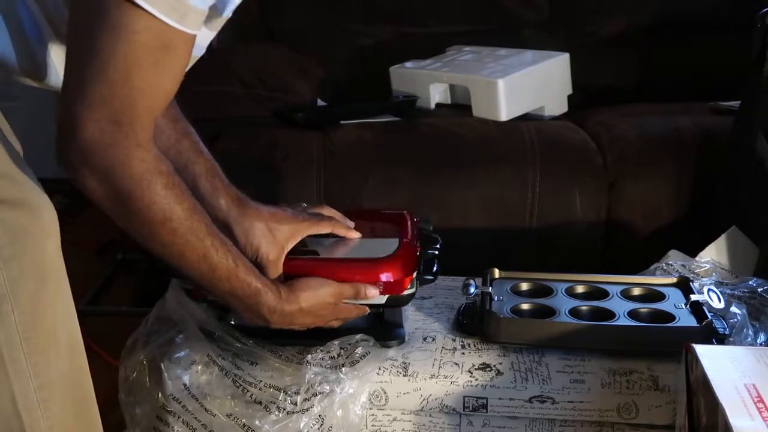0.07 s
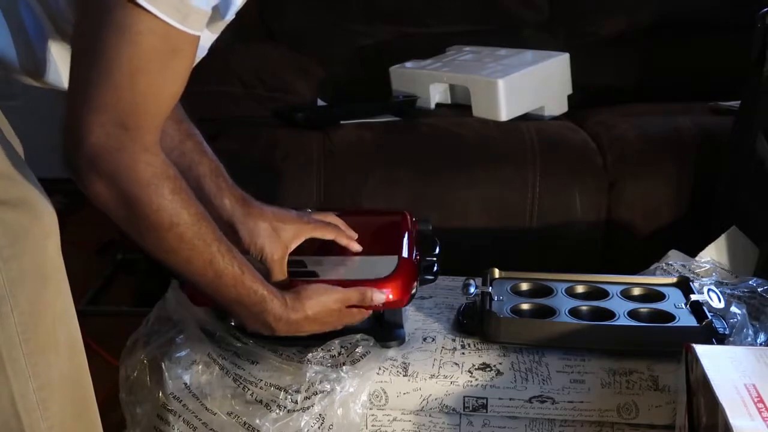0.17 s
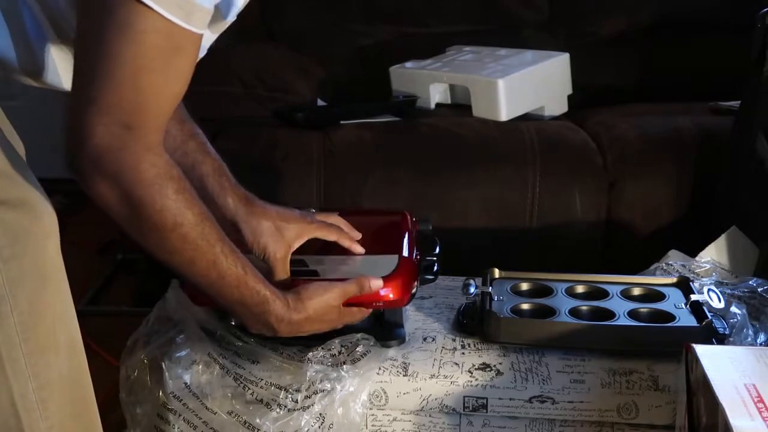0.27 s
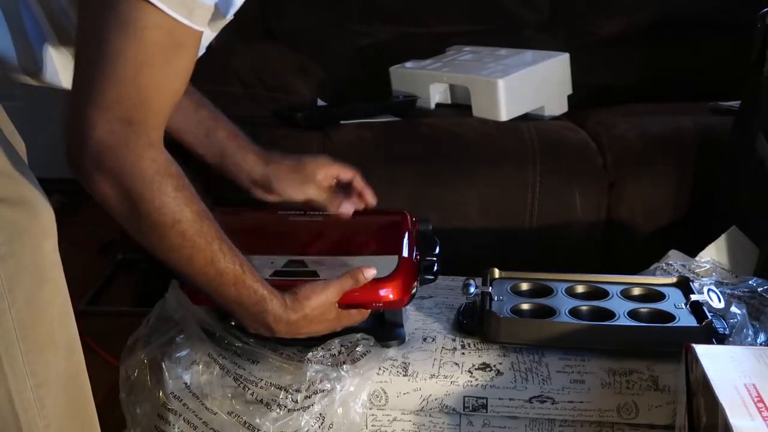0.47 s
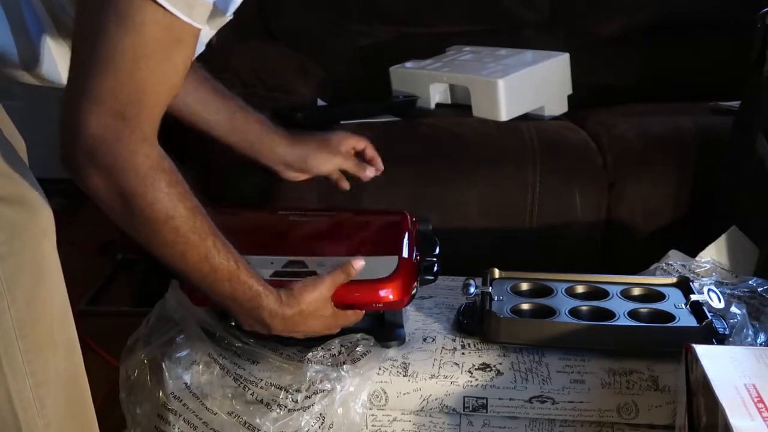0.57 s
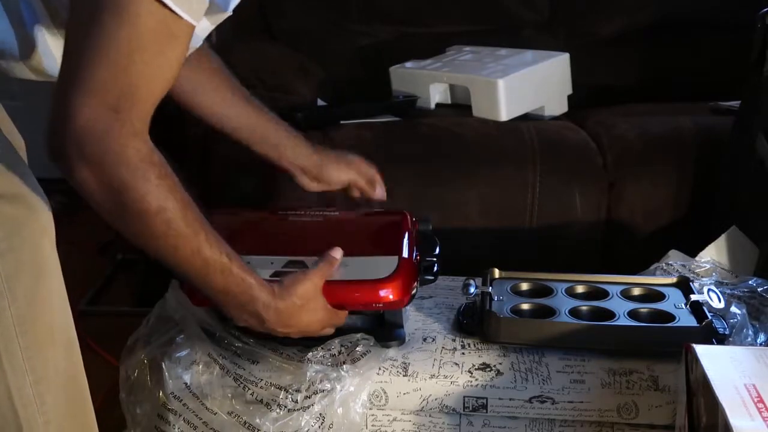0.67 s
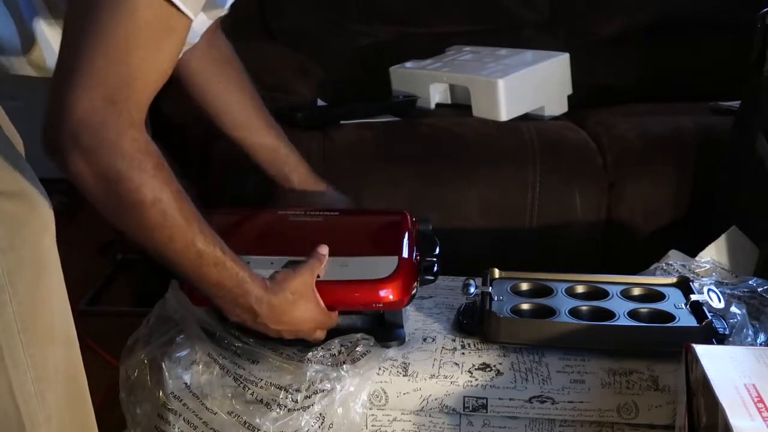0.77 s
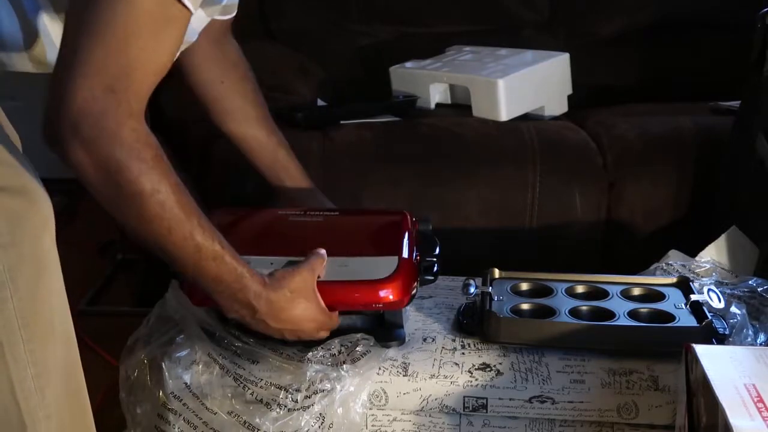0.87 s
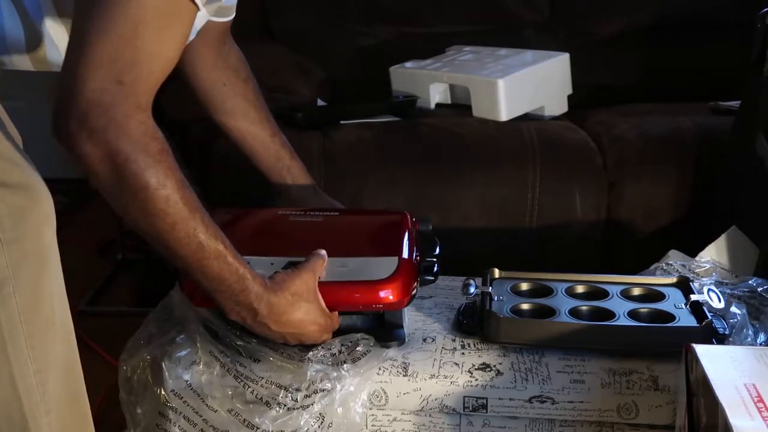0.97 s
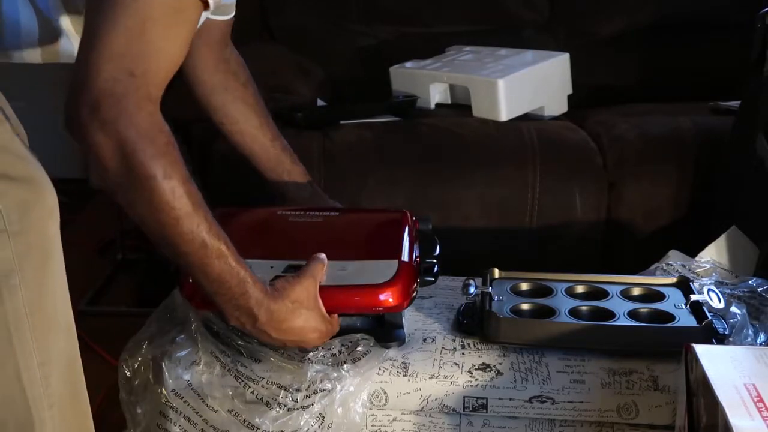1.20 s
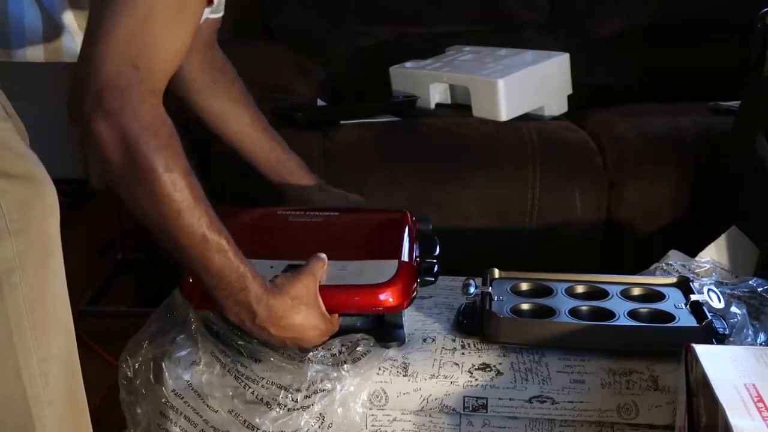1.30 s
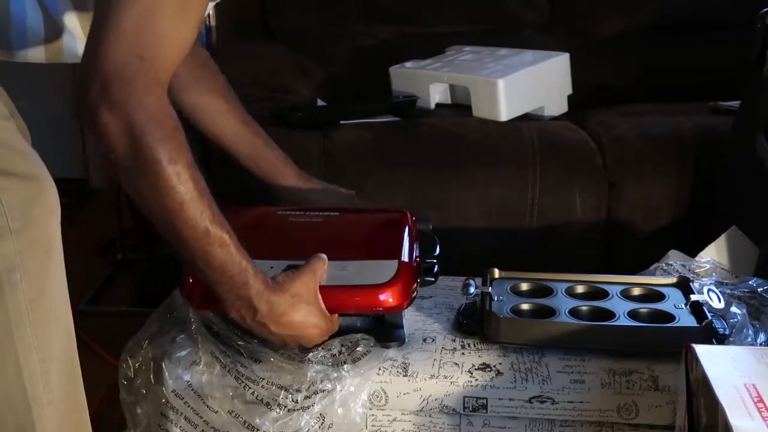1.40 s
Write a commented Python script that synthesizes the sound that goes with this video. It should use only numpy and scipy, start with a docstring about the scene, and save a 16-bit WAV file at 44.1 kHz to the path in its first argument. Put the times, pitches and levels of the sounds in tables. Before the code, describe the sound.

A small grill's lid clacks on its catch at about 0.2 seconds and slams shut a split second later, with a table thud and a metallic ring that fades by 0.6. A hand bumps softly on the housing near 0.9 seconds. From 1.0 to 1.2 come light knocks and clicks while plastic wrapping rustles. It is all heard close, in a quiet room with a faint low hum.

```python
"""The lid of a small electric grill is pressed shut in a living room. It clacks on its catch, then
slams home: the plastic-wrapped grill's metal plates ring, the table thuds and a short room tail follows.
A hand then shifts on the housing with dull bumps, then light knocks and clicks, while the wrapping
under the grill rustles. A low hum lies under it all; two close microphone ports hear the scene and
differ chiefly in the treble."""
import sys
import numpy as np
from scipy import signal
from scipy.fft import rfft, irfft
from scipy.io import wavfile
from scipy.ndimage import uniform_filter1d, minimum_filter1d

SR = 44100
rng = np.random.default_rng(int(sys.argv[2]) if len(sys.argv) > 2 else 0)


def put_to_file(sound):
    """Save the sound as 16-bit audio at rate SR, in the file named by the first command-line argument."""
    columns = np.atleast_2d(sound).T  # one column per channel
    safe = np.clip(columns, -1, 1)
    whole_steps = np.round(safe * 32767)
    wavfile.write(sys.argv[1], SR, whole_steps.astype(np.int16))


N = 63945


def undb(db):
    """Amplitude ratio of a level in decibels."""
    return 10 ** (np.asarray(db) / 20)


def clock():
    """Uniform sampling: the time of every sample [s]."""
    return np.arange(N) / SR


def unit(x):
    """Normalisation to rms 1."""
    return x / np.sqrt(np.mean(x ** 2) + 1e-20)


def conv(x, response):
    """Convolution with an impulse response."""
    return signal.fftconvolve(x, response)[:N]


def delay(x, s):
    """Time shift by s seconds."""
    return np.concatenate([np.zeros(max(int(s * SR), 0)), x])[:N]


def curve(points):
    """Amplitude envelope through (time [s], level [dB]) points."""
    return undb(np.interp(clock(), *np.array(points).T))


def log_frequencies():
    """Logarithmic frequency axis of a spectrum of 2 N samples."""
    return np.log(np.arange(N + 1) * SR / (2 * N) + 1)


def colour(x, points, keep_power=True):
    """Minimum-phase filter through (frequency [Hz], level [dB]) points."""
    hz, db = np.array(points, float).T
    gain = undb(np.interp(log_frequencies(), np.log(hz), db))
    cepstrum = irfft(np.log(unit(gain) if keep_power else gain))
    cepstrum[1:N] *= 2  # folding the cepstrum makes the filter causal
    cepstrum[N + 1:] = 0
    return irfft(rfft(x, 2 * N) * np.exp(rfft(cepstrum)))[:N]


def fade(t60):
    """Exponential decay by 60 dB in t60 seconds."""
    return np.exp(-np.log(1000) * clock() / max(t60, 1e-3))


def rise(s):
    """First-order build-up with a time constant of s seconds."""
    return 1 - np.exp(-clock() / s)


def ring(modes):
    """Modal superposition: damped sines of alternating sign."""
    return sum((-1) ** k * undb(db) * fade(t60) * np.sin(2 * np.pi * hz * clock())
               for k, (hz, db, t60) in enumerate(modes))


def burst(envelope, smooth_hz=120):
    """Spectral whitening: a noise burst with broad peaks and dips levelled, its fine structure kept."""
    spectrum = rfft(rng.standard_normal(N) * envelope)
    power = uniform_filter1d(np.abs(spectrum) ** 2, size=int(smooth_hz * N / SR))
    whitened = irfft(spectrum / np.sqrt(power / power.mean() + 1e-9), N)
    return whitened * (clock() < N / SR / 2)


def background():
    """Stationary noise: the room's broadband air and a narrow band that hums."""
    # spectrum of the air (frequency [Hz], level [dB])
    air_colour = [(25, -16), (70, -6), (196, -3.5), (383, -7), (640, -10.5), (1120, -13), (2240, -18.5),
                  (5000, -31), (10600, -40.5), (15000, -51.5)]
    hum_hz = 66
    hum_colour = [(hum_hz / 2, -30), (hum_hz, 0), (hum_hz * 2, -22), (hum_hz * 10, -80)]
    hum = colour(rng.standard_normal(N), hum_colour)
    air = colour(rng.standard_normal(N), air_colour)
    return undb(-55) * air + undb(-61) * hum


def hiss():
    """Anti-phase noise: a faint hiss that lies only in the difference of the two channels, with opposite sign
    in each."""
    # spectrum of the hiss (frequency [Hz], level [dB])
    hiss_colour = [(25, -10), (200, -2.5), (500, 0), (1000, -8.5), (2000, -8.5), (3400, -14), (5000, -17),
                   (7500, -27), (12000, -23.5), (15000, -32.5)]
    return undb(-59) * colour(rng.standard_normal(N), hiss_colour)


def handling():
    """Structure-borne sound: dull handling noise travels through the table."""
    # envelope of the handling (time [s], level [dB])
    levels = [(0, -51.5), (.14, -48), (.22, -42.5), (.56, -64.5), (.61, -55.5), (.7, -54.5), (.86, -54.5),
              (.92, -47), (1.0, -48.5), (1.1, -45), (1.18, -50.5), (1.26, -49), (1.31, -52), (1.35, -50),
              (1.45, -48)]
    # its spectrum (frequency [Hz], level [dB])
    handling_colour = [(40, -21), (110, -11.5), (195, -1), (290, -6.5), (390, -7), (600, -18.5),
                       (1500, -30), (5000, -50)]
    return colour(rng.standard_normal(N), handling_colour) * curve(levels)


def room():
    """Reverberation: diffuse reflections build up quickly and are absorbed band by band."""
    # bands of the tail (frequency [Hz], extra absorption [dB/s], level [dB])
    bands = [(102.8, 13.5, 9.5), (307.7, 16, -0.5), (970, 5.5, 0.5), (2530, 10, -6), (5400, 3.5, -1),
             (8000, 47, 1.5), (11600, 165, -4)]
    envelope = rise(0.0011) * fade(t60=0.36)
    spectrum = rfft(burst(envelope), 2 * N)
    log_centres = np.log([row[0] for row in bands])
    tail = 0
    for share, (_, absorption, db) in zip(np.eye(len(bands)), bands):
        band = irfft(spectrum * np.interp(log_frequencies(), log_centres, share))[:N]
        tail = tail + undb(db - absorption * clock()) * band
    return delay(tail / np.linalg.norm(envelope), s=.003)


def crinkles(per_s=3300, spread_db=2.5):
    """A Poisson process of tiny clicks of uneven size."""
    size = undb(spread_db * np.minimum(rng.exponential(size=N), 4))
    clicks = rng.random(N) < per_s / SR
    return unit(clicks * size * rng.choice([-1, 1], N))


def wrapping():
    """Crackling noise: clicks of the plastic film merge into a rustle with a few crisp flurries."""
    # envelope of the rustle (time [s], level [dB])
    rustle_levels = [(0, -52), (.14, -62.5), (.2, -48.5), (.55, -79.5), (.69, -61), (.77, -62), (.86, -60),
                     (.94, -53), (.98, -44), (1.03, -42.5), (1.1, -64), (1.15, -47), (1.22, -51.5),
                     (1.28, -58), (1.45, -53.5)]
    # its spectrum (frequency [Hz], level [dB])
    rustle_colour = [(100, -6.5), (250, 1), (600, -0.5), (1300, -2), (3000, -5), (5000, -14), (8000, -21),
                     (13000, -29), (16000, -37)]
    # Gaussian flurries of crackle (time [s], level [dB], standard deviation [s])
    crackles = [(.975, -70, 0.018), (1.045, -52, 0.02), (1.105, -45.5, .011), (1.35, -61.5, 0.07)]
    # their spectrum (frequency [Hz], level [dB])
    crackle_colour = [(1000, -16), (4000, 4), (7000, -3.5), (13000, -5.5), (16000, -18)]
    flurries = sum(undb(db) * np.exp(-.5 * ((clock() - s) / width) ** 2) for s, db, width in crackles)
    rustle = colour(crinkles() * curve(rustle_levels), rustle_colour)
    return rustle + colour(crinkles() * flurries, crackle_colour)


def contact(hz, t60):
    """Impact transient: the struck spot gives off a few damped cycles."""
    envelope = fade(t60) * rise(0.00052) ** 2
    return envelope / envelope.max() * np.sin(2 * np.pi * hz * clock())


def clatter(t60):
    """Modal overlap: the shell's many close modes blend into noise, new at each strike."""
    # spectrum of the shell (frequency [Hz], level [dB])
    shell_colour = [(60, -39), (130, -31), (220, -13.5), (350, 0), (500, 2), (800, -2), (1300, 1.5),
                    (1650, -2), (1920, -5), (2250, 5), (2550, -2.5), (2850, 2.5), (3400, -5.5), (4700, -7),
                    (5200, -18.5), (5800, -14.5), (7000, -23), (8300, -23.5), (10000, -43), (13000, -36.5),
                    (16000, -50.5)]
    return colour(burst(fade(t60)), shell_colour)


def bumps():
    """Soft impacts with friction: the hand lands on the lid in dull, scuffing touches."""
    # touches of the hand (time [s], level [dB], frequency [Hz])
    touches = [(0.8777, -40.5, 880), (.8812, -33.5, 930), (.8845, -35.5, 624), (0.8912, -37.5, 970),
               (0.903, -45, 1277), (.911, -43, 597)]
    # spectrum of the scuff (frequency [Hz], level [dB])
    scuff_colour = [(100, -9), (400, -7.5), (650, -4), (1000, 1.5), (1500, 2.5), (2400, 1), (3500, -15.5),
                    (6000, -27.5), (15000, -51)]
    out = 0
    for s, db, hz in touches:
        scuff = undb(-11) * colour(burst(fade(t60=0.12)), scuff_colour)
        out = out + delay(undb(db) * (contact(hz, t60=0.027) + scuff), s)
    return out


def knocks():
    """Impulsive excitation: the housing knocks and clicks lightly under the hand."""
    # light blows (time [s], level [dB], frequency [Hz], t60 [s], relative clatter level [dB])
    taps = [(0.9703, -37, 3030, 0.0028, 3), (1.0524, -24, 1060, 0.003, -4), (1.0687, -25, 1570, 0.003, -16),
            (1.0798, -38, 1300, .007, 0), (1.090, -25.5, 616, 0.0051, -7.5),
            (1.0933, -20.5, 2370, 0.0074, -11), (1.0944, -29, 3200, 0.0025, -13),
            (1.145, -45, 2580, 0.014, 3), (1.204, -37, 570, 0.017, -26)]
    out = 0
    for s, db, hz, t60, clatter_db in taps:
        shell = undb(clatter_db - 3) * clatter(t60=0.027)
        out = out + delay(undb(db) * (contact(hz, t60) + shell), s)
    return out


def thud():
    """Damped resonance: the table gives under the slam and answers in its low modes."""
    # modes of the table (frequency [Hz], level [dB], t60 [s])
    modes = [(66.9, -15, 0.33), (132, -12, 0.16), (144.8, 0, .17), (229.4, 0, 0.11)]
    return delay(undb(-24.5) * ring(modes) * rise(0.0045), s=.263)


def plates():
    """Free vibration: the metal plates ring on after each clack."""
    # modes of the plates and lid (frequency [Hz], level [dB], t60 [s])
    modes = [(322, -18.5, 0.24), (370.4, 3.5, 0.27), (558, -5, 0.21), (717, -1.5, 0.247),
             (841.5, 1.5, 0.23), (1002, -5.5, 0.28), (1082, -9.5, .38), (1236, -1, 0.1), (1412, -2, .25),
             (1645, -0.5, 0.23), (1730, -1, .22), (2204, -0.5, 0.11), (2302, -2, 0.26), (2715, -1, 0.22),
             (3240, -6, .26)]
    # the two clacks that excite them (time [s], level [dB])
    clacks = [(0.2043, -5.5), (0.2618, 0.5)]
    tone = undb(-25) * ring(modes)
    return sum(delay(undb(db) * tone, s) for s, db in clacks)


def catch():
    """Broadband transient: the catch ticks brightly as it shuts."""
    # spectrum of the tick (frequency [Hz], level [dB])
    tick_colour = [(1500, -15.5), (4500, 7), (6000, -0.5), (7800, -5.5), (10000, -6.5), (13000, -13),
                   (16000, -36.5)]
    return delay(undb(-14.5) * colour(burst(fade(t60=0.011)), tick_colour), s=.2627)


def lid():
    """Impacts on coupled bodies: each contact cracks, rattles the shell and thumps the base."""
    # lid contacts (time [s], level [dB], frequency [Hz], relative clatter level [dB], thump level [dB])
    impacts = [(0.204, -7.5, 2730, -1.5, -13.5), (0.2062, -6, 2580, -4.5, -18),
               (.2110, -15, 1270, 2.5, -13.5), (0.2161, -21.5, 2900, 8, -20), (0.2323, -22, 1270, 4, -16.5),
               (.2470, -14, 1290, 0.5, -14), (.2615, -9, 3930, -1, -16), (0.2625, -1.5, 2182, -2.5, -10),
               (0.2644, -3.5, 3324, -5.5, -14), (.2672, -6.5, 733, -4, -3.5),
               (0.2712, -14.5, 3977, -8, -15), (.2805, -8, 1567, -5.5, -18)]
    # modes of the base on the table (frequency [Hz], level [dB], t60 [s])
    base_modes = [(291, -2.5, 0.12), (344.3, -2.5, .12), (416, -4.5, .09), (490, -4, 0.075),
                  (708, -7.5, 0.098)]
    thump = undb(-17.5) * ring(base_modes) * rise(.001)
    out = 0
    for s, db, hz, clatter_db, thump_db in impacts:
        blow = contact(hz, t60=0.0041) + undb(clatter_db - 7) * clatter(t60=0.058)
        out = out + delay(undb(db) * blow + undb(thump_db) * thump, s)
    return out


def scene():
    """Superposition of direct sound and room, as the sum and difference of two close ports."""
    # response of the left-right difference (frequency [Hz], level [dB])
    side_colour = [(100, -42), (400, -26.5), (1000, -20.5), (2000, -13.5), (3200, -9.5), (4500, -3),
                   (7000, 4), (13000, 12.5)]
    direct = catch() + lid() + bumps() + knocks() + undb(-3.5) * wrapping()
    mid = direct + plates() + thud() + conv(direct, room()) + handling() + background()
    side = undb(-11) * delay(direct, s=.0002) + conv(direct, room())
    side = colour(side, side_colour, keep_power=False) + hiss()
    return np.array([mid + side, mid - side])


def record(dry):
    """Peak limiting with one fast gain for both channels, then low-pass filtering."""
    limit, hold_s, cutoff_hz = 1.0, .002, 14700
    hold = int(hold_s * SR)
    needed_gain = limit / np.maximum(np.abs(dry).max(axis=0), limit)
    gain = uniform_filter1d(minimum_filter1d(needed_gain, size=hold), size=hold)
    lowpass = signal.ellip(8, .2, 80, cutoff_hz, fs=SR, output="sos")
    return signal.sosfilt(lowpass, dry * gain)


dry = scene()
out = record(dry)
put_to_file(out)
```